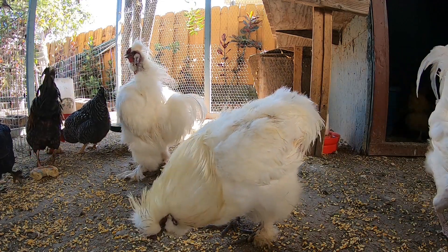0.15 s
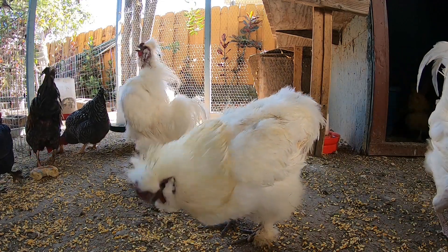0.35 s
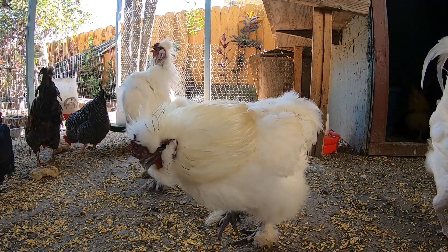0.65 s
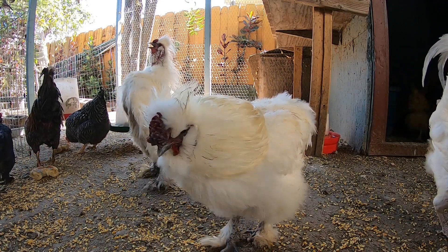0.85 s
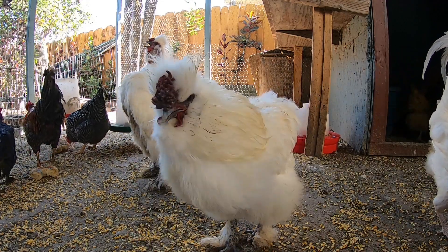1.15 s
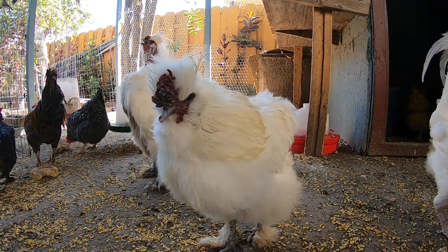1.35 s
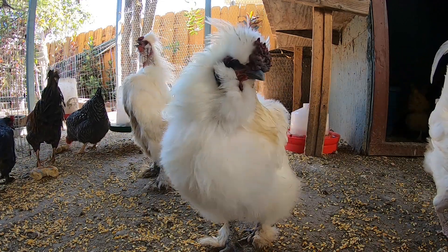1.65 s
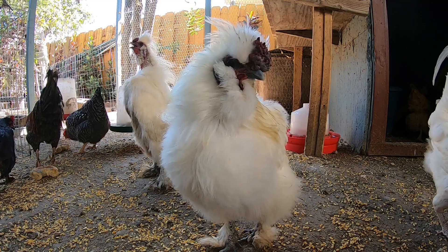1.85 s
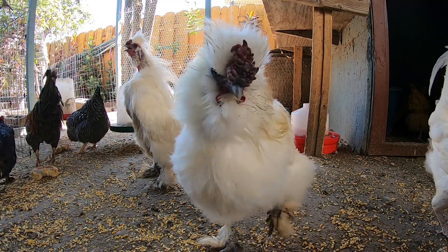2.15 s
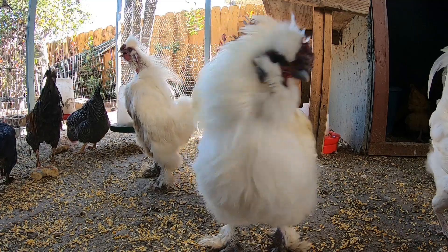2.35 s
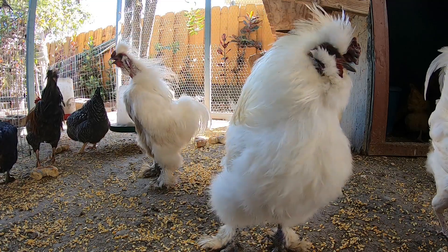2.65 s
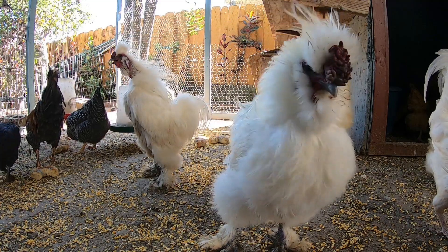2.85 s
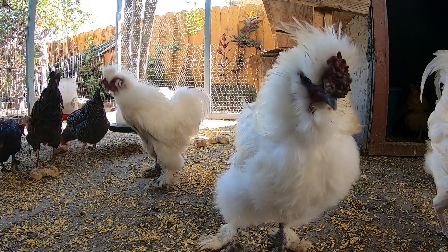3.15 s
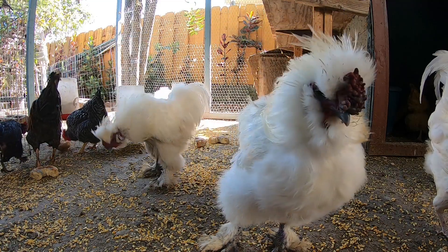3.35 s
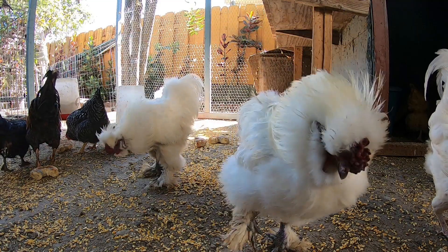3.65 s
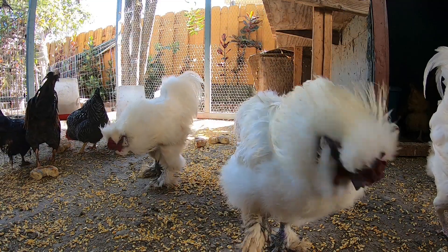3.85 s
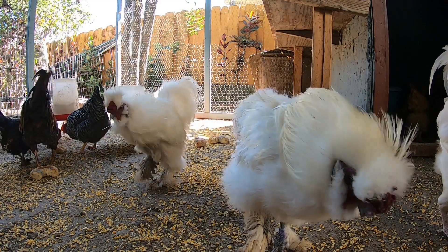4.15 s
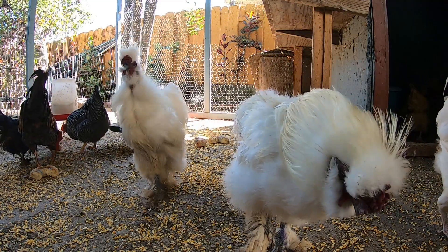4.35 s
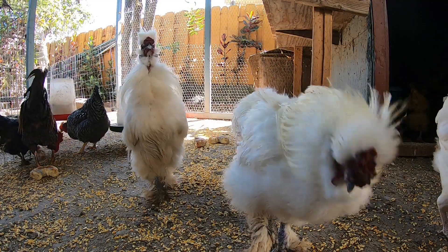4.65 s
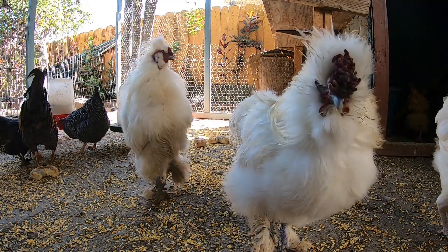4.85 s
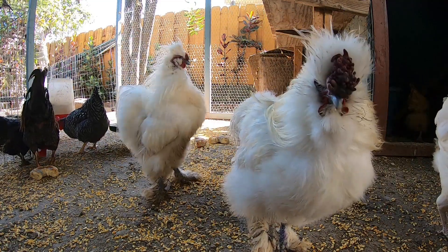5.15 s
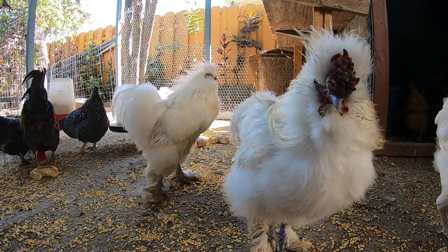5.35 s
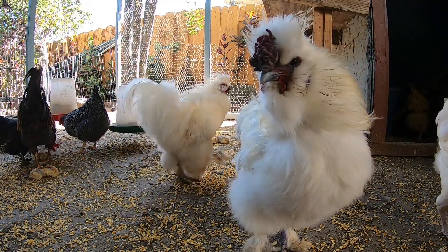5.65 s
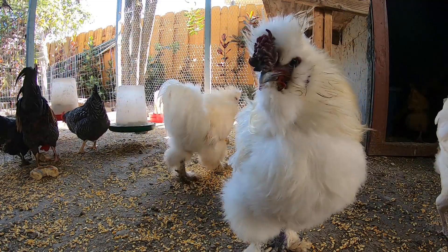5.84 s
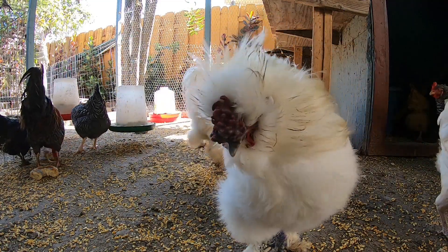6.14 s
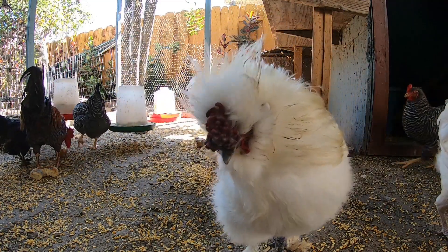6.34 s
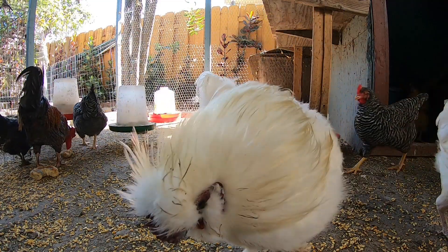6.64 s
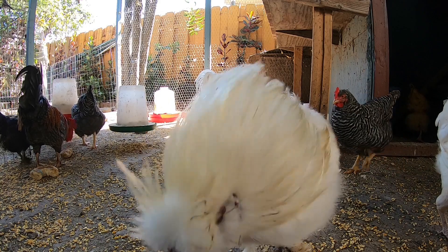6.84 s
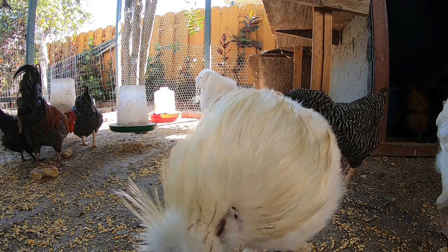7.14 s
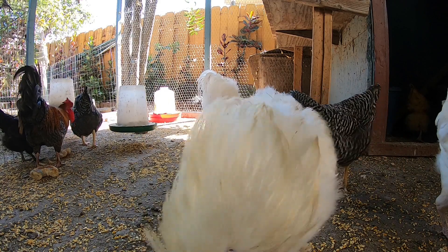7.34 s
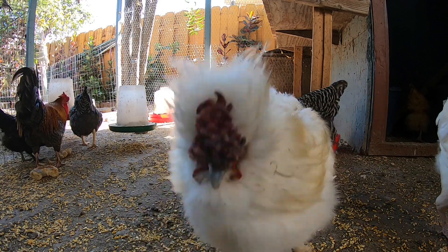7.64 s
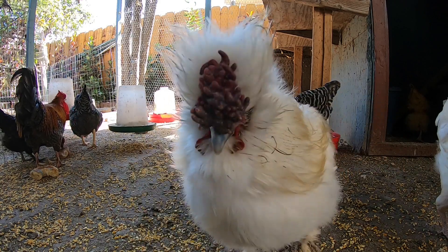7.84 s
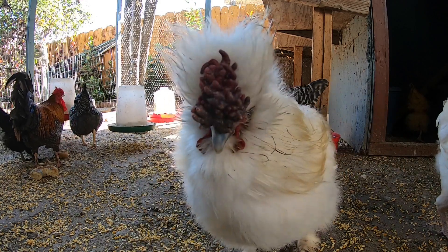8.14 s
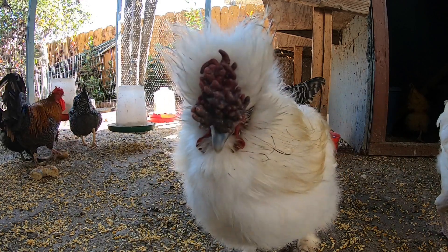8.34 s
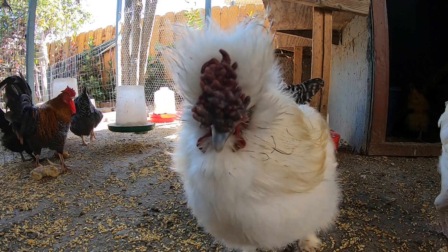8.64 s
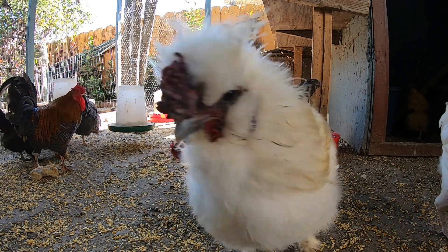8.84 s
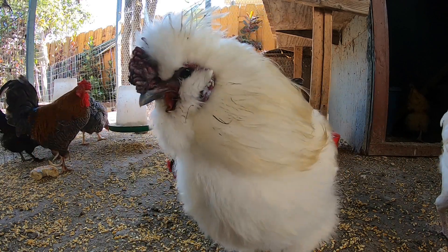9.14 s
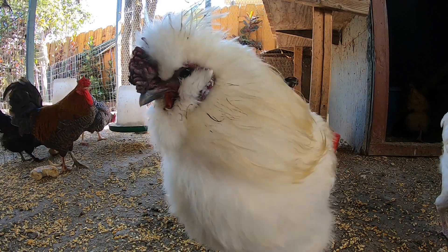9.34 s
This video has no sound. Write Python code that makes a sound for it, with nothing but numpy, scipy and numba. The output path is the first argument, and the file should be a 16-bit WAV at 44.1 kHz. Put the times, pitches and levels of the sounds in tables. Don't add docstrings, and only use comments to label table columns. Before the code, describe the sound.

Hoarse rooster crow up close in a chicken run, then hens croon and cluck, beaks tick on grain, and a finch whistles over distant traffic rumble.

```python
import sys
import numpy as np
from scipy import signal
from scipy.fft import rfft, irfft, next_fast_len
from scipy.io import wavfile
from numba import njit

SR = 44100
rng = np.random.default_rng(int(sys.argv[2]) if len(sys.argv) > 2 else 0)


def volts_from_db(level):
    exponent = np.asarray(level, float) / 20
    return 10 ** exponent


def digitize_waveform(pressure):
    field = np.atleast_2d(pressure).T
    bounded = np.clip(field, -1, 1)
    quanta = np.round(bounded * 32767).astype(np.int16)
    wavfile.write(sys.argv[1], SR, quanta)


N = 418509
TIME = np.arange(N) / SR

# start t/s, end t/s, pitch f/Hz, level/dB, rasp over tone level/dB
SHORT_NOTE = [
    (.4405, .53, 878.4, -21, 13),
    (.575, .585, 854, -32, 30.5),
]
LONG_CROW = [(.757, .765, 809.3, -20.5, 7.5), (.79, .84, 1069, -14.5, -31), (.858, .93, 990.7, -24.5, 10.5),
             (.96, 1.05, 917, -22, 8), (1.1, 1.31, 1051, -18, -17), (1.36, 1.5, 1000, -22.5, 11),
             (1.6, 1.85, 994.3, -22, 9.5), (2.0, 2.43, 914.8, -23, -3), (2.5, 2.55, 731.2, -22.5, 4.5),
             (2.66, 2.72, 735.7, -22.5, 5.5), (2.77, 2.8, 685, -23, 6.5), (2.83, 2.872, 626, -24.5, -7)]
# f/Hz, level/dB
CROW_TONE = [(600, -5.5), (720, 7.5), (880, -1.5), (1060, -3.5), (1400, 2.5), (1800, -3.5), (2100, 3),
             (2750, -0.5), (3250, -22.5), (3700, -1), (4350, -17.5), (5300, -24), (6400, -33.5),
             (8500, -31), (12000, -52.5)]
# t/s, level/dB
CHEST = [(.44, -4), (.6, -1), (.76, -2.5), (1.0, 1), (1.1, -9.5), (1.3, -5.5), (1.4, 2.5), (1.62, 0.5),
         (1.75, -1.5), (2.0, -7), (2.42, -7.5), (2.5, -1), (2.8, 0), (2.9, -0.5)]
# f/Hz, f with the neck stretched/Hz, width/Hz,
# level/dB
WINDPIPE = [(424, 424, 300, -33), (1338, 1247, 220, -1), (1633, 1650, 160, -11), (1995, 2065, 90, 2),
            (2305, 2100, 110, -10), (2736, 2480, 150, -3.5), (3250, 2760, 190, -11),
            (3738, 3623, 160, -7.5), (4300, 4150, 200, -18)]
# f/Hz, width/Hz, level/dB
MOUTH = [(5200, 260, -24), (6280, 440, -19), (7490, 160, -23.5), (8680, 380, -23), (10030, 300, -28),
         (11280, 310, -34.5), (13500, 700, -39.5)]
# t/s, stretch of the mouth resonances, cancelled f/Hz, depth 0-1
GAPE = [(.44, 1.0, 5900, .5), (.8, .95, 6600, .3), (1.3, .96, 5900, .6), (1.65, 1.005, 5900, .7),
        (2.1, 1.02, 6050, .85), (2.42, 1.015, 5700, .9), (2.58, 1.01, 4750, .98), (2.9, 1.03, 4550, .98)]
# t/s, level/dB
BEAK_OPENS = [(.44, -5), (1.3, 0.5), (2.15, 0), (2.5, -0.5), (2.78, 2.5), (2.85, 8.5)]
# f/Hz, level/dB
CROW_BALANCE = [(300, -4), (700, 9.5), (1200, 6), (2100, 1.5), (3800, 4), (8000, 0.5)]
# f/Hz, phase/rad
CROW_PHASE = [(300, -0.2), (600, 0.91), (950, -0.6), (1300, -0.12), (2000, -1.4), (2300, -0.49),
              (3000, -0.91), (4000, 0.17)]

# t/s, length t/s, pitch f/Hz, level/dB
CACKLE = [
    (-.015, 0.2, 359.8, -33),
    (.256, 0.17, 351, -29),
    (.52, 0.19, 360.3, -39),
    (.83, 0.16, 356, -38),
]
# t/s, pitch f/Hz, level/dB
SQUAWK_START = [
    [(9.455, 1198, -38), (9.46, 1155, -19), (9.47, 1067, -17)],
]
SQUAWK = [
    [(9.468, 740, -22), (9.472, 690, -17), (9.49, 660, -21)],
]
PEEP = [
    [(6.845, 390, -56), (6.853, 398, -28.5), (6.875, 396, -55), (6.89, 400, -64)],
]
WHINE = [
    [(6.145, 443, -50), (6.165, 423, -44.5), (6.23, 315.5, -47.5), (6.26, 303, -64)],
]
# t/s, length t/s, from f/Hz, to f/Hz, level/dB
CROON = [
    (3.501, 0.28, 262, 269.1, -46.5),
    (3.8, .16, 249.6, 270, -47.5),
    (6.429, .13, 255, 247.4, -42),
    (6.581, .15, 291, 280, -47),
]
MOAN = [
    (3.47, 0.046, 304, 298, -42.5),
    (3.771, 0.048, 298, 298, -43),
    (3.85, .21, 281.6, 316, -42),
    (6.275, .16, 261, 273, -39),
    (6.5, 0.21, 295.4, 308, -44.5),
]
# t/s, peak level/dB, pitch f/Hz, left-right level/dB
CLUCKS = [(3.343, -34, 264, -8.5), (4.295, -32.5, 332, -3), (4.639, -36.5, 412, -8), (5.241, -42, 324, -5),
          (5.455, -32.5, 342, -3), (5.614, -22.5, 348.6, 3), (5.659, -29, 328, -12), (5.801, -34, 269, -9),
          (5.824, -23, 340, 2), (6.045, -30.5, 280, -9)]
BARKS = [
    (7.236, -18.5, 412.4, -1.5),
    (7.671, -23.5, 419, -0.48),
    (8.069, -23.5, 446, -1.4),
    (8.908, -29, 387, -0.5),
    (9.375, -22, 347, -0.78),
]
# f/Hz, width/Hz, level/dB
CROON_RASP = [(562, 190, -0.5), (1012, 160, 1), (1550, 110, -8.5), (1880, 120, -23.5)]
# f/Hz, level/dB
CACKLE_THROAT = [(200, 4), (360, -14.5), (720, -1), (1080, -0.5), (1440, -8), (1800, -16), (2400, -32.5),
                 (2900, -19), (4100, -23), (4900, -40), (5600, -20), (6600, -43.5), (7700, -26.5),
                 (10000, -44.5)]
SQUAWK_START_THROAT = [(1100, 0), (2200, -7), (3300, -20), (5000, -32), (9000, -42)]
SQUAWK_THROAT = [(500, 4), (700, 2), (1450, 7.5), (2150, -1), (3000, -21), (4300, -38), (6500, -24),
                 (13000, -43)]
PEEP_THROAT = [(400, -29), (800, 5), (1200, -6), (1600, 4), (2000, -25), (2400, -13), (3300, -25),
               (5000, -45)]
WHINE_THROAT = [(300, -8), (550, -5), (900, -23), (1250, 5), (1700, -2), (2400, -11), (3500, -37),
                (8000, -35)]
CROON_THROAT = [(150, -28), (300, -6), (580, 2), (800, -10), (1050, 1.5), (1500, -13), (2200, -33),
                (4000, -39), (8000, -34)]
CLUCK_THROAT = [(150, -5), (300, 4.5), (580, -3.5), (800, -1.5), (1050, -9.5), (1500, -9.5), (2200, -20),
                (4000, -24), (8000, -51)]
BARK_THROAT = [(250, -4), (420, 6), (800, 1.5), (1250, -2), (1700, -11), (2200, -26), (4000, -30.5),
               (8000, -63)]

# t/s, peak level/dB, brightness level/dB, left-right level/dB, time to fall 60 dB t/s
SCUFFS = [(3.231, -49.5, 7, 6, 0.47), (4.451, -27.5, -17, -6.5, 0.28), (4.533, -30.5, -16, -4.5, 0.36),
          (5.035, -41, -3, -11, 0.27), (5.082, -32, -18, -3.5, 0.19), (5.285, -40, -5, -11, 0.088),
          (5.365, -39.5, -2, -12, 0.25), (5.45, -41, 5, -3.5, 0.5), (5.734, -23, -20, -6, 0.29),
          (6.149, -36.5, -4.5, -13, 0.73), (6.76, -38.5, -27, -2, 0.34), (7.207, -35, -21, -4, 0.1),
          (7.867, -42.5, -9.5, -8, 0.11), (6.908, -29.5, -48, -4, 0.26), (7.45, -44.5, -24, -13.5, 0.26),
          (7.557, -35, -26, -8, 0.16), (8.078, -21, -8, -1, 0.13), (8.28, -39, -27, -7, 0.72),
          (8.325, -33.5, -29, -9, 0.59), (8.378, -29.5, -31, -3.5, 0.35), (8.463, -32, -31.5, -7, 0.54),
          (8.709, -51, -3, -14, 0.14), (8.905, -24, -17, -2, 0.26), (9.147, -38, -9, -1, 0.153)]
# t/s, peak level/dB, body level/dB, left-right level/dB
PECKS = [(3.2388, -50, -7, 0), (3.5912, -50, -10, -14), (3.6435, -43, 2, -7), (4.0892, -35, -1, -13),
         (4.3607, -50, -11, -8), (4.4231, -49, -8, 1), (4.5605, -47, 1, -17), (4.8042, -56, -9, -3),
         (5.2841, -52, 3, -14), (5.439, -34, -22, -15), (5.588, -52, 8, -6), (5.8184, -44, -12, 0),
         (6.2821, -40.5, -7, 9), (6.3722, -41, -14, 6), (6.451, -49, -13, -8), (6.4849, -42, -3, -2),
         (7.1319, -45.5, -1, -19), (7.2157, -50, -12, -9), (7.2886, -46, -2, -16), (7.421, -46, -4, -14),
         (7.5196, -48.5, -9, -14), (7.7136, -39, 6.5, -8), (8.2903, -53.5, -6, -6), (8.5777, -40, -5.5, -9),
         (8.862, -49, -5, -9), (8.9179, -45, 6, 11)]
# t/s, level/dB
FLAP = [
    (6.04, -64),
    (6.1, -46),
    (6.14, -55),
    (6.2, -68),
]
# t/s, length t/s, from f/Hz, to f/Hz, level/dB
GLIDES = [(2.936, 0.077, 4140, 3460, -52.5), (3.184, 0.023, 4140, 3550, -47),
          (3.283, 0.053, 3050, 3835, -44.5), (3.421, 0.049, 4250, 3475, -42),
          (3.467, 0.043, 4800, 3020, -51.5), (3.604, 0.044, 4140, 3250, -40),
          (3.719, 0.039, 2610, 4360, -45.5), (3.848, 0.054, 4300, 3180, -38.5),
          (3.927, 0.077, 4730, 4060, -55), (4.027, 0.051, 3100, 2360, -40), (4.148, 0.053, 3160, 2290, -40),
          (4.279, 0.053, 3165, 2280, -41), (4.442, 0.061, 4166, 2674, -37),
          (4.707, 0.028, 4240, 3510, -39.5), (4.715, 0.027, 4570, 4180, -47.5),
          (4.839, 0.059, 5940, 4070, -47), (4.954, 0.058, 4730, 3340, -45), (5.071, .095, 2085, 3793, -41),
          (5.288, 0.078, 5810, 3970, -49.5), (5.425, 0.075, 4300, 3250, -46),
          (5.582, 0.039, 4060, 3070, -47.5), (5.645, 0.065, 3650, 2330, -41.5),
          (5.815, 0.014, 3780, 5030, -46.5), (5.822, 0.029, 4300, 2770, -47),
          (5.894, 0.066, 4135, 2320, -40.5), (6.147, 0.053, 3590, 4300, -62)]
# t/s, length t/s, f/Hz, level/dB
WHISTLES = [(3.135, 0.063, 4065, -54.5), (3.57, 0.04, 4090, -40), (3.76, 0.037, 3940, -46.5),
            (3.76, 0.027, 4440, -50.5), (3.898, 0.053, 3223, -43), (4.395, 0.036, 3755, -48.5),
            (4.425, 0.022, 4057, -37.5), (4.655, 0.065, 4220, -41), (5.495, 0.072, 3780, -54),
            (5.795, 0.071, 3746, -40.5), (5.925, 0.047, 3260, -45), (5.975, 0.071, 2930, -39),
            (6.2, 0.32, 3940, -65.5)]
# t/s, level/dB
TRAFFIC = [(0.0, -51), (0.29, -51), (1.24, -64), (1.64, -63.5), (3.78, -54.5), (4.28, -58), (4.54, -50),
           (6.48, -52), (6.82, -55), (8.03, -46.5), (8.88, -48.5), (9.49, -52.5)]
# f/Hz, level per Hz/dB
RUMBLE = [(12, -42), (20, -13.5), (54, 4), (140, -6), (180, -36), (310, -120)]
MURMUR = [(120, -24.5), (200, -15.5), (285, -21), (369, -3.5), (477, -16.5), (617, -10), (834, -7),
          (2600, -29.5), (3380, -43), (5720, -120)]
RUSTLE = [(1800, -17), (2300, 4), (3500, -6.5), (5000, -9.5), (6500, -6), (8500, -9.5), (10500, -30),
          (12000, -46), (15500, -59)]
# f/Hz, likeness
LIKENESS = [(30, 0.5), (250, 0.63), (500, 0.62), (1000, 0.3), (4000, 0.27), (12000, 0.26)]


def rms_one(x):
    return x / np.sqrt(np.mean(x ** 2) + 1e-20)


def at_hz(points, hz):
    return np.interp(np.log(hz), np.log(np.array(points)[:, 0]), np.array(points)[:, 1])


def at_time(points, t):
    return np.interp(t, *np.transpose(points))


def span(rows):
    s, *columns = np.transpose(rows)
    where = slice(max(round(s[0] * SR), 0), min(round(s[-1] * SR), N))
    return where, [np.interp(TIME[where], s, c) for c in columns]


def drift(rate, size=N):
    r = np.exp(-2 * np.pi * rate / SR)
    noise = rng.standard_normal(size + 4000)
    return rms_one(signal.lfilter([1], [1, -2 * r, r * r], noise)[4000:])


def band(x, low_hz, high_hz):
    sos = signal.butter(2, [low_hz, min(high_hz, .45 * SR)], "band", fs=SR, output="sos")
    return signal.sosfilt(sos, x)


def panned(x, pan_db):
    return x * volts_from_db(np.array([[pan_db / 2], [-pan_db / 2]]))


def add_at(out, s, sound):
    start = round(s * SR)
    out[:, start:start + sound.shape[1]] += sound


def fade(size, edge_s):
    ramp = np.arange(size) / (edge_s * SR)
    return np.clip(np.minimum(ramp, ramp[::-1]), 0, 1)


@njit
def resonate(x, cosine, r):
    y = np.zeros(len(x))
    for i in range(2, len(x)):
        y[i] = (1 - r * r) / 2 * (x[i] - x[i - 2]) + 2 * r * cosine[i] * y[i - 1] - r * r * y[i - 2]
    return y


def resonance(x, hz, width_hz):
    return resonate(x, np.cos(2 * np.pi * hz / SR) * np.ones(len(x)), np.exp(-np.pi * width_hz / SR))


def ring(x, hz, width_hz, second_width_hz):
    return rms_one(resonance(resonance(x, hz, width_hz), hz, second_width_hz))


def overtones(pitch, throat, rough, uneven=0, dull_db=0):
    size = len(pitch)
    pitch = pitch * (1 + 0.0921 * rough * drift(159.5, size))
    phase = 2 * np.pi * np.cumsum(pitch) / SR
    gains = []
    for k in range(1, min(int(9000 / pitch.mean()), 24)):
        level_db = at_hz(throat, k * pitch) - dull_db * np.log2(max(k / 3, 1))
        gains.append(volts_from_db(level_db) * (k * pitch < 13000))
    tone = sum(g * np.cos(k * phase + .3 * k * k) for k, g in enumerate(gains, 1))
    tone = tone + uneven * gains[0] * (np.cos(3 * phase / 2) + np.cos(5 * phase / 2))
    shimmer = volts_from_db(11.2 * rough * np.clip(drift(124, size), -2.5, 1.6))
    return np.sqrt(2) * tone * shimmer / np.sqrt(np.sum(np.square(gains), axis=0))


def rooster():
    out = np.zeros(N)
    for rows in crow_rows(SHORT_NOTE, release_s=.064), crow_rows(LONG_CROW, release_s=.03):
        where, columns = span(rows)
        out[where] = crow(TIME[where], *columns)
    out -= 0.8 * resonance(out, 11850, 1500)
    size = next_fast_len(N)
    hz = np.maximum(np.arange(size // 2 + 1) * SR / size, 1)
    half = volts_from_db(at_hz(CROW_BALANCE, hz) / 2) * np.exp(.5j * at_hz(CROW_PHASE, hz))
    return irfft(rfft(out, size) * np.array([half, 1 / half]), size)[:, :N]


def crow_rows(syllables, release_s):
    attack_s, start_db, end_db, sag_hz_per_s = .003, -25, -32.5, 60
    rows = []
    for a, b, hz, db, rasp in syllables:
        rows += [(a, hz, db, rasp), (b, hz - sag_hz_per_s * (b - a), db, rasp)]
    a, hz, db, rasp = rows[0]
    b, last_hz, last_db, last_rasp = rows[-1]
    start = (a - attack_s, hz, db + start_db, rasp)
    end = (b + release_s, last_hz, last_db + end_db, last_rasp)
    return sorted([start] + rows + [end])


def crow(t, steady_pitch, effort_db, hoarse_db):
    size = len(t)
    tone_db = effort_db - 10 * np.log10(1 + volts_from_db(2 * hoarse_db))
    rasp_db = tone_db + hoarse_db
    rough = np.clip(0.2385 + 0.0146 * hoarse_db, .01, 1)
    warble_start_s, warble_end_s, warble_edge_s, warble_hz = 1.1, 1.31, .065, 30.27
    warble = np.clip(1 + np.minimum(t - warble_start_s, warble_end_s - t) / warble_edge_s, 0, 1)
    flutter = warble * np.sin(2 * np.pi * warble_hz * t + .8 * drift(12, size))
    pitch = steady_pitch * (1 + .035 * flutter)

    cycle = np.cumsum(pitch * volts_from_db(1.5 * drift(200, size))) / SR
    strength = np.clip(rng.normal(0.3, 1, size), -1.3, 1.5)
    slaps = np.diff(np.floor(cycle), prepend=0) * strength
    slaps = slaps + 0.12 * rng.standard_normal(size)
    rasp = windpipe(slaps, t, pitch, steady_pitch)
    _, (stretch, notch_hz, depth) = None, [np.interp(t, np.array(GAPE)[:, 0], c) for c in np.transpose(GAPE)[1:]]
    rasp = rasp + mouth(slaps, t, stretch)

    rougher = rough + .19 * warble
    uneven = 0.18 * np.clip(hoarse_db / 10 + 2, 0, 1) + 0.17 * warble
    dull_db = 12.5 * np.clip(3 * rougher, 0, 1)
    voice = volts_from_db(tone_db + 0.92 * flutter) * overtones(pitch, CROW_TONE, rougher, uneven, dull_db)
    voice += volts_from_db(rasp_db - 2.7 * flutter + 1.9 * drift(14, size)) * rms_one(rasp)
    for width_hz in (1100, 800, 600):
        voice -= np.clip(depth, 0, 1) * resonance(voice, notch_hz, width_hz)
    return voice


def windpipe(slaps, t, pitch, steady_pitch):
    size = len(t)
    low_hz = 836.4 + .62 * np.minimum(steady_pitch - 900, 0)
    rasp = volts_from_db(-0.5 + at_time(CHEST, t)) * ring(slaps, low_hz, 88, 88)
    neck = np.clip((880 - pitch) / 150, 0, 1)
    for k, (hz, stretched_hz, width_hz, level_db) in enumerate(WINDPIPE):
        hz = (hz + neck * (stretched_hz - hz)) * (1 + .009 * drift(7.8, size))
        gain = volts_from_db(level_db + 1.5 * drift(3.9, size))
        rasp -= (-1) ** k * gain * ring(slaps, hz, 2 * width_hz, width_hz)
    return rasp


def mouth(slaps, t, stretch):
    size, out = len(t), 0
    for k, (hz, width_hz, level_db) in enumerate(MOUTH):
        hz = hz * stretch * (1 + .009 * drift(4.9, size))
        breath = slaps + 0.3 * rng.standard_normal(size)
        gain = volts_from_db(level_db + at_time(BEAK_OPENS, t) + 2.0 * drift(2.7, size))
        out = out + (-1) ** k * gain * ring(breath, hz, 2 * width_hz, 2 * width_hz)
    return out


def calls(tables, throat, rough, lift_db):
    out = np.zeros(N)
    for rows in tables:
        where, (pitch, level_db) = span(rows)
        out[where] += volts_from_db(level_db + lift_db) * fade(len(pitch), 0.0014) * overtones(pitch, throat, rough)
    return out


def cackle_rows(events):
    attack_s, release_s, first_ratio, last_ratio, first_db, last_db = .04, .075, .85, 1.012, -21, -20
    return [[(s, hz * first_ratio, db + first_db),
             (s + attack_s, hz, db),
             (s + length - release_s, hz * last_ratio, db),
             (s + length, hz * last_ratio, db + last_db)] for s, length, hz, db in events]


def clucks(events, throat, rough, length_s, sag=0):
    out = np.zeros((2, N))
    for s, peak_db, hz, pan_db in events:
        u = np.linspace(0, 1, round(length_s * SR))
        shape = np.sin(np.pi * u ** 0.718) ** 2.14
        pitch = hz * (.8 + 0.209 * shape + sag * (1 / 2 - u))
        cluck = volts_from_db(peak_db - 11.0) * shape * overtones(pitch, throat, rough)
        add_at(out, s - .007, panned(cluck, pan_db))
    return out


def croons(events, rasp_db, rough):
    out = np.zeros(N)
    for s, length, from_hz, to_hz, db in events:
        where, (pitch,) = span([(s, from_hz), (s + length, to_hz)])
        size = len(pitch)
        pitch = pitch * (1 + .025 * drift(15, size))
        cycle = np.cumsum(pitch * volts_from_db(1.2 * drift(90, size))) / SR
        pulses = np.diff(np.floor(cycle), prepend=0) * rng.normal(0.67, 1, size)
        rasp = 0
        for hz, width_hz, level_db in CROON_RASP:
            hz = hz * (1 + .03 * drift(7.9, size))
            rasp = rasp + volts_from_db(level_db) * ring(pulses, hz, width_hz, 2 * width_hz)
        moan = overtones(pitch, CROON_THROAT, rough) + volts_from_db(rasp_db) * rms_one(rasp)
        out[where] += volts_from_db(db - 5 + 2.15 * drift(23, size)) * fade(size, .015) * moan
    return out


def scuffs():
    out, t = np.zeros((2, N)), TIME[:round(.3 * SR)]
    for s, peak_db, bright_db, pan_db, t60 in SCUFFS:
        noise = rng.standard_normal((2, len(t))) * volts_from_db(3.5 * drift(69, len(t)))
        thump = rms_one(band(noise[0], 270, 944)) + volts_from_db(-1.0) * rms_one(band(noise[0], 175, 430))
        grit = volts_from_db(bright_db) * rms_one(band(noise[1], 1040, 3500))
        shape = volts_from_db(peak_db - 11.0 - 60 * t / max(t60, .03)) * (1 - np.exp(-t / 0.0032))
        add_at(out, s - .004, panned((thump + grit) * shape, pan_db))
    return out


def pecks():
    out, t = np.zeros((2, N)), TIME[:round(.04 * SR)]
    for s, peak_db, body_db, pan_db in PECKS:
        noise = rng.standard_normal((2, len(t)))
        tick = rms_one(band(band(noise[0], 7070, 8960), 3300, 8100))
        body = volts_from_db(body_db + 7.5) * rms_one(band(noise[1], 1700, 3300))
        add_at(out, s, panned((tick + body) * volts_from_db(peak_db - 5.5 - 60 * t / 0.01), pan_db))
    return out


def finch():
    out = np.zeros(N)
    for rows in finch_notes():
        where, (hz, level_db) = span(rows)
        phase = 2 * np.pi * np.cumsum(hz * (1 + 0.013 * drift(220, len(hz)))) / SR
        whistle = np.sin(phase) + volts_from_db(-31) * np.sin(2 * phase)
        out[where] += volts_from_db(level_db + 6.5) * fade(len(hz), 0.0029) * whistle
    return out


def finch_notes():
    swell_db, fade_db_per_s, tilt_db_per_octave = -8, 29, 6.5
    notes = []
    for s, length, a, b, db in GLIDES:
        tilt_db = tilt_db_per_octave * np.log2(b / a) / 2
        bend = 0.33 if b < a else 0.67
        notes.append([(s, a, db - tilt_db + swell_db),
                      (s + length / 2, a + bend * (b - a), db),
                      (s + length, b, db + tilt_db)])
    for s, length, hz, db in WHISTLES:
        notes.append([(s, hz, db + swell_db),
                      (s + length / 3, hz, db),
                      (s + length, hz, db - fade_db_per_s * length)])
    return notes


def yard():
    traffic_db = at_time(TRAFFIC, TIME)
    hum_hz, hum_width_hz = 171.4, 8.4
    noise = rng.standard_normal((2, N))
    hum = ring(noise[0], hum_hz, hum_width_hz, hum_width_hz)
    roar = volts_from_db(-0.5) * hum + rms_one(band(noise[1], 88, 218.0))
    out = volts_from_db(traffic_db + 1.5) * bed(RUMBLE, patchy_db=2.5, rate=7.2) + volts_from_db(traffic_db - 1) * roar

    hush_db = -6.5 * np.clip((3.52 - TIME) / 0.165, 0, 1)
    crooning = sum(np.sin(np.pi * np.clip((TIME - s) / length, 0, 1))
                   for s, length, *_ in CROON[::2] + MOAN[2::2])
    murmur_db = -55.5 + 4.5 * crooning + hush_db
    rustle = bed(RUSTLE, patchy_db=1.5, rate=16.0)
    out = out + volts_from_db(murmur_db) * bed(MURMUR, patchy_db=3.5, rate=6.1) + volts_from_db(-65 + hush_db / 2) * rustle
    shake, (shake_db,) = span(FLAP)
    out[:, shake] += volts_from_db(shake_db) * rms_one(band(rustle[:, shake], 2400, 15000))
    return out


def bed(spectrum, patchy_db, rate):
    out, together = 0, drift(rate)
    edges = 2 ** np.arange(np.log2(spectrum[0][0]), np.log2(spectrum[-1][0]), .5)
    white = rng.standard_normal((2, 2, N))
    for k, (low_hz, high_hz) in enumerate(zip(edges, edges[1:])):
        mid, side = band(white[k % 2], low_hz, high_hz)
        hz = np.sqrt(low_hz * high_hz)
        alike = np.clip(at_hz(LIKENESS, hz), -1, 1)
        alone = 1.9 * np.roll(together, 9173 * (k + 1))
        gain = volts_from_db(at_hz(spectrum, hz) + patchy_db * (together + alone))
        out = out + gain * (np.sqrt(1 + alike) * mid + np.sqrt(1 - alike) * side * [[1], [-1]])
    return rms_one(out)


def echoes(x, t60, delay_s, alike):
    t = TIME[:round(.4 * SR)]
    noise = rng.standard_normal((3, len(t)))
    tail = (alike * noise[0] + noise[1:]) * volts_from_db(-60 * t / t60) * (t > delay_s)
    tail = signal.lfilter([1], [1, -.2], tail)
    tail = tail / np.sqrt(np.mean(np.sum(tail ** 2, axis=1)))
    return signal.fftconvolve(x * np.ones((2, 1)), tail, axes=1)[:, :N]


def scene():
    cackle = calls(cackle_rows(CACKLE), CACKLE_THROAT, rough=0.15, lift_db=0)
    squawk = calls(SQUAWK_START, SQUAWK_START_THROAT, rough=.08, lift_db=-4)
    squawk = squawk + calls(SQUAWK, SQUAWK_THROAT, rough=.5, lift_db=-3.5)
    peep = calls(PEEP, PEEP_THROAT, rough=0.055, lift_db=-7.0)
    near = rooster() + panned(cackle, -4.0) + panned(squawk, 10.0) + panned(peep, 9)
    near = near + scuffs() + pecks()

    far = clucks(CLUCKS, CLUCK_THROAT, rough=.5, length_s=0.0336)
    far = far + clucks(BARKS, BARK_THROAT, rough=.28, length_s=0.046, sag=0.225)
    crooning = croons(CROON, rasp_db=0, rough=.5) + croons(MOAN, rasp_db=-9, rough=.16)
    whine = calls(WHINE, WHINE_THROAT, rough=.45, lift_db=-3)
    far = far + panned(crooning + whine, -4)

    run = echoes(volts_from_db(-6) * near + volts_from_db(-1.5) * far, t60=0.19, delay_s=0.0063, alike=0.38)
    song = finch()
    trees = panned(song, -4.5) * volts_from_db(-7) + echoes(song, t60=0.32, delay_s=0.0015, alike=1.4)
    return near + far + run + trees + yard()


def top_cut(x):
    return signal.sosfilt(signal.butter(12, 15100, fs=SR, output="sos"), x)


def record(dry):
    mid, side = (dry[0] + dry[1]) / 2, (dry[0] - dry[1]) / 2
    high_pass = signal.butter(3, 470, "high", fs=SR, output="sos")
    side = .92 * signal.sosfiltfilt(high_pass, side) + volts_from_db(-19) * side
    rounded = .9 * np.tanh(np.array([mid + side, mid - side]) / .9)
    return top_cut(rounded)


dry = scene()
out = record(dry)
digitize_waveform(out)
```